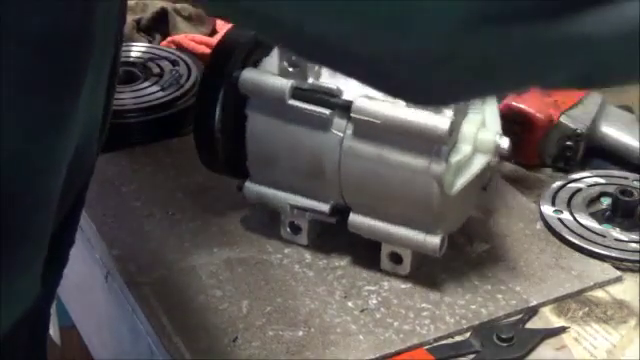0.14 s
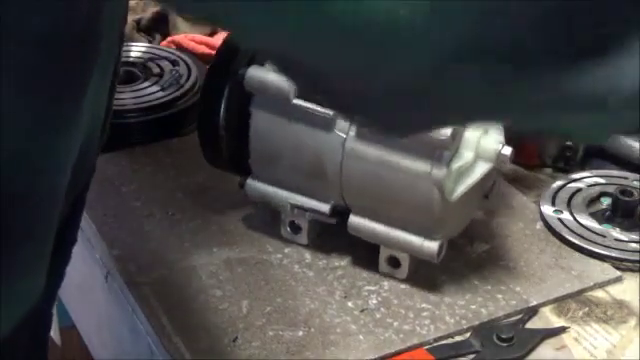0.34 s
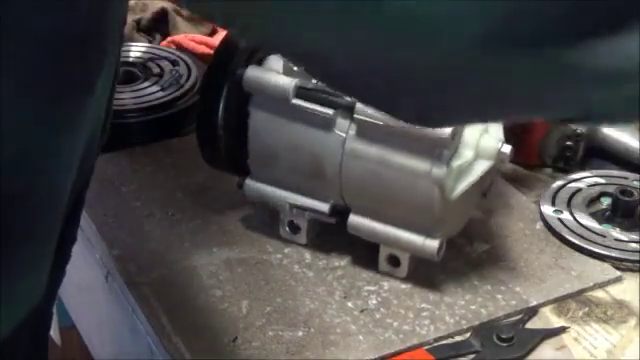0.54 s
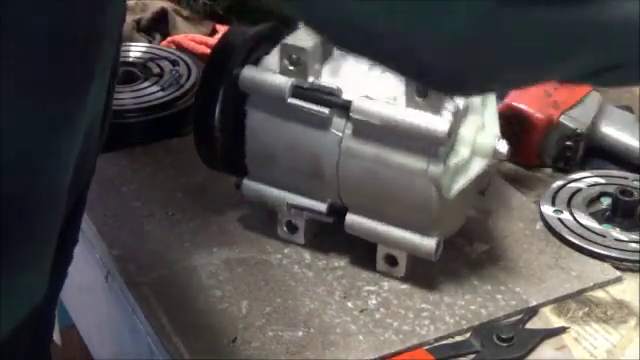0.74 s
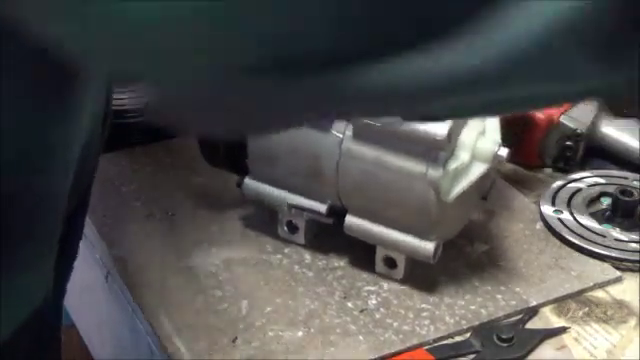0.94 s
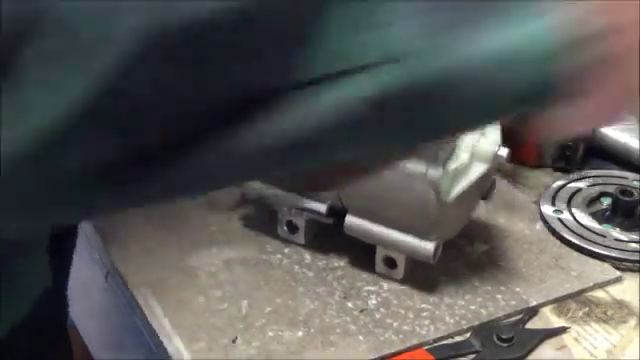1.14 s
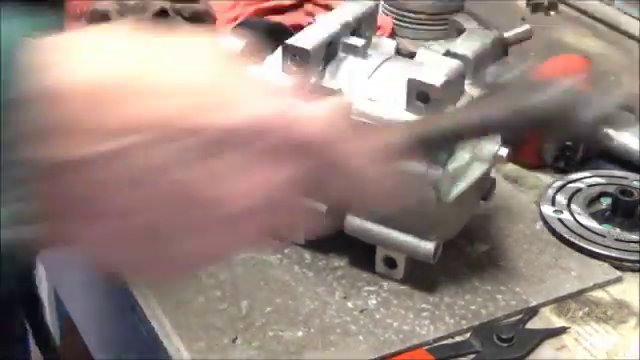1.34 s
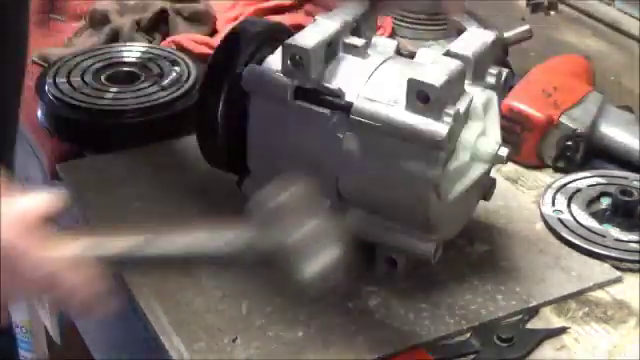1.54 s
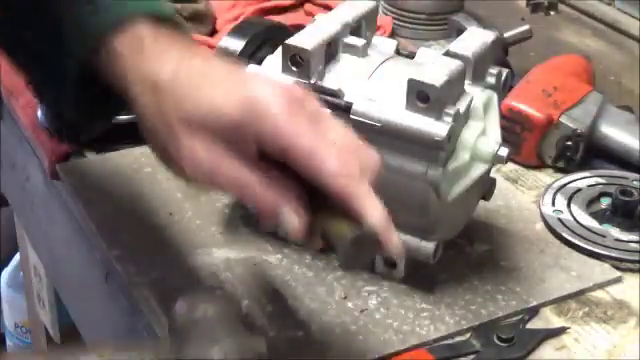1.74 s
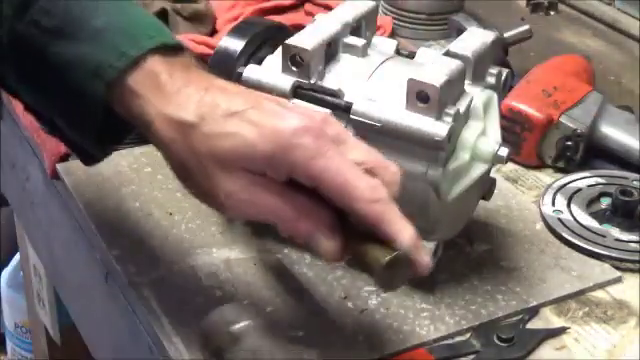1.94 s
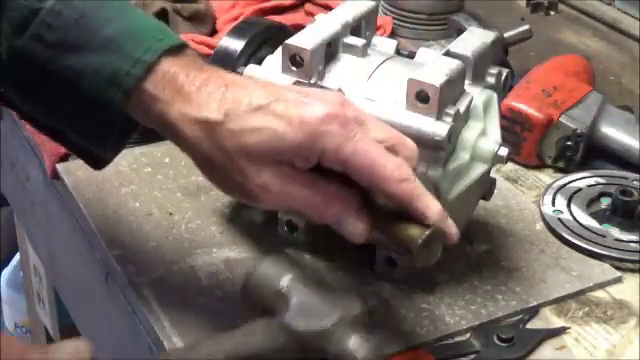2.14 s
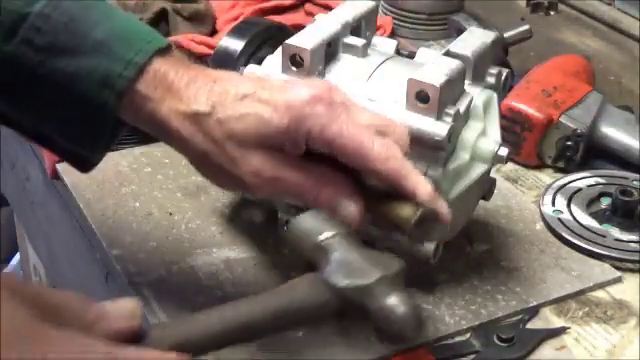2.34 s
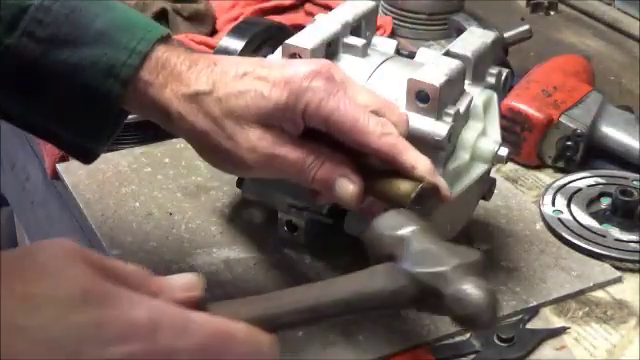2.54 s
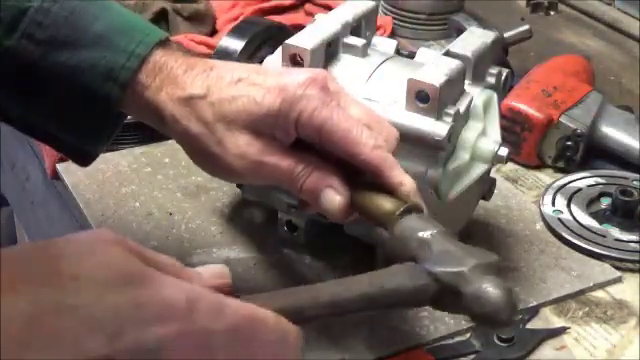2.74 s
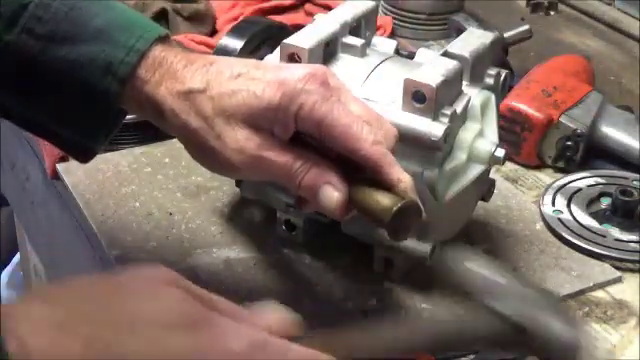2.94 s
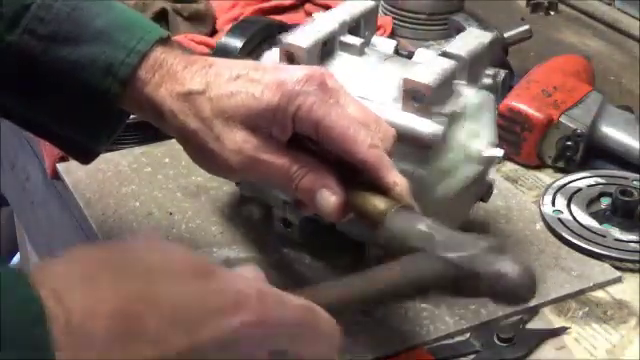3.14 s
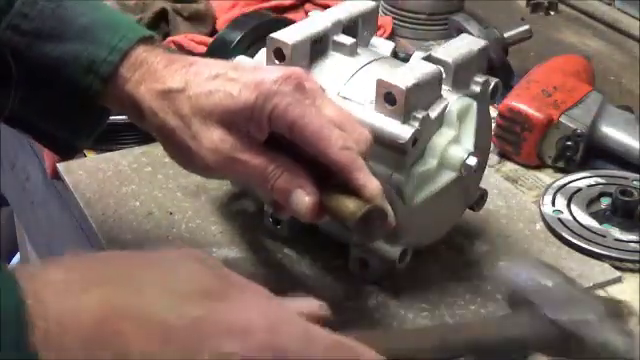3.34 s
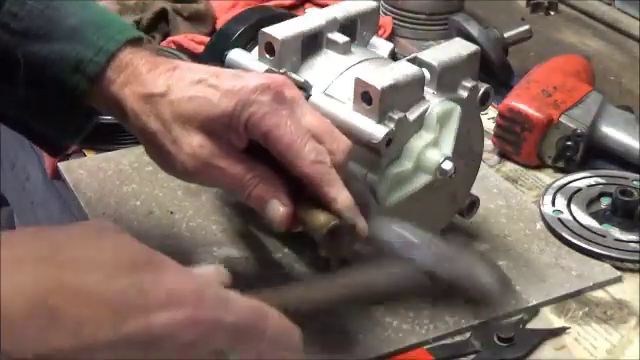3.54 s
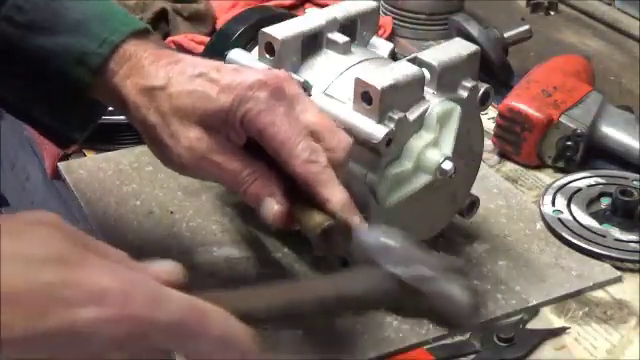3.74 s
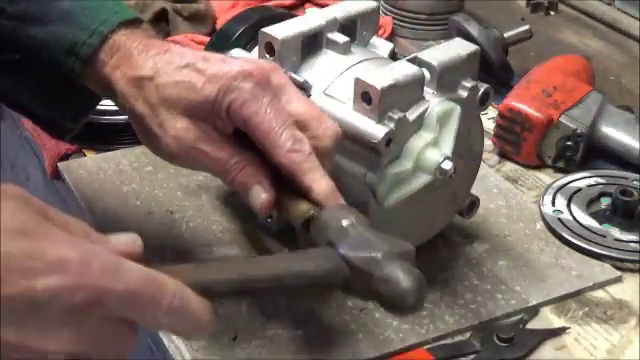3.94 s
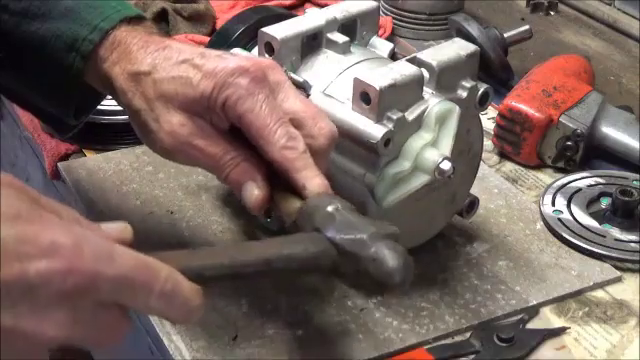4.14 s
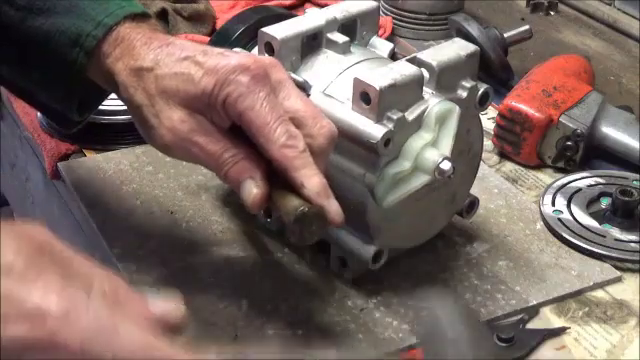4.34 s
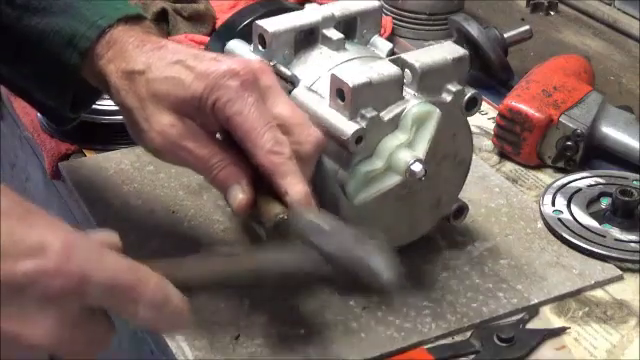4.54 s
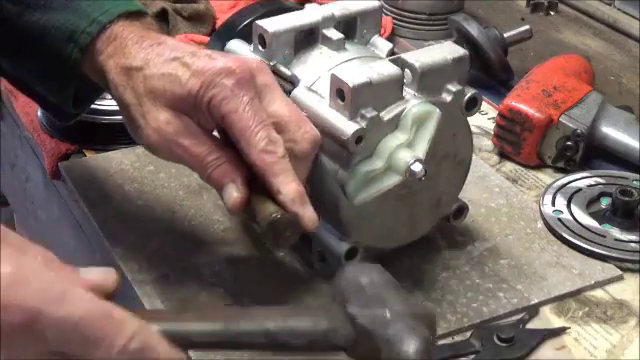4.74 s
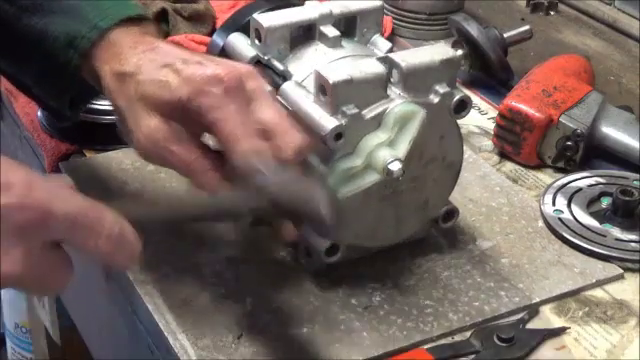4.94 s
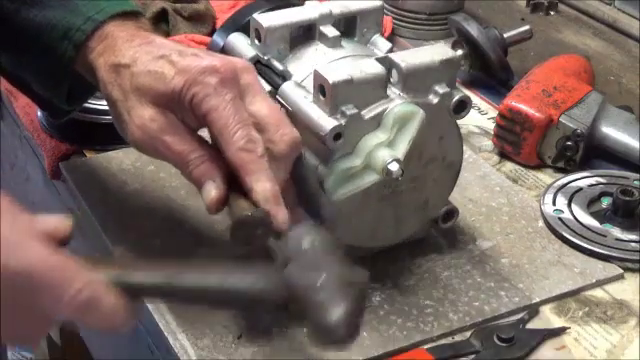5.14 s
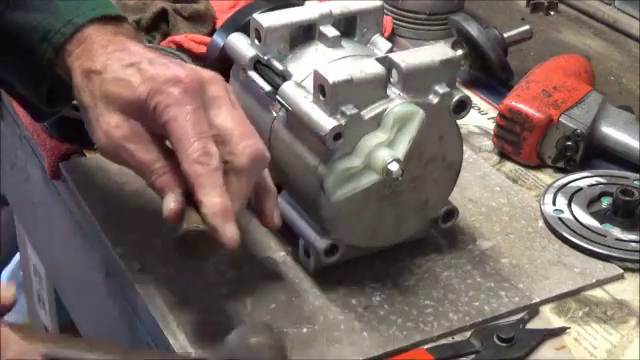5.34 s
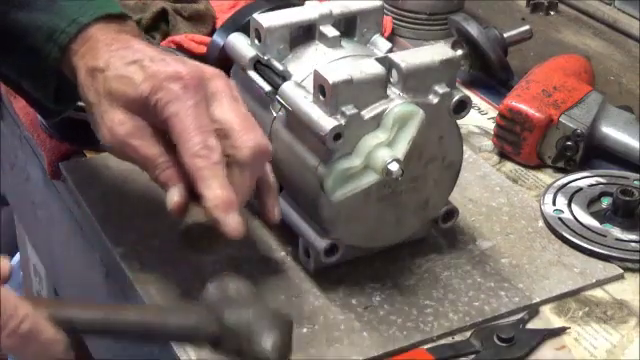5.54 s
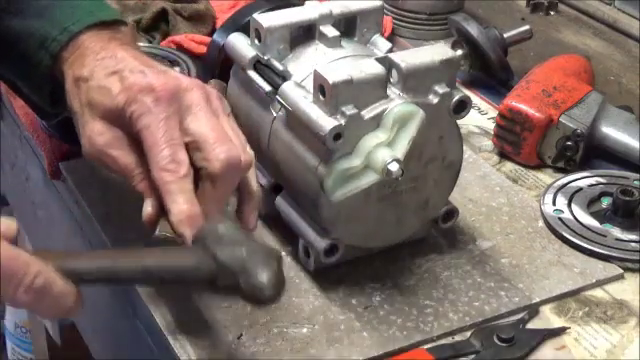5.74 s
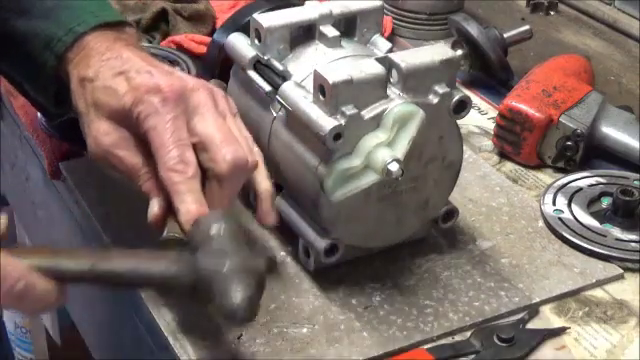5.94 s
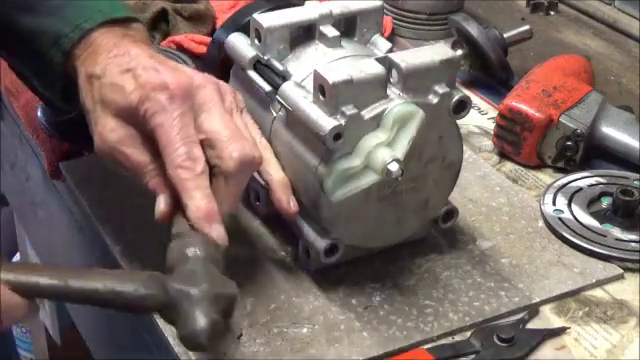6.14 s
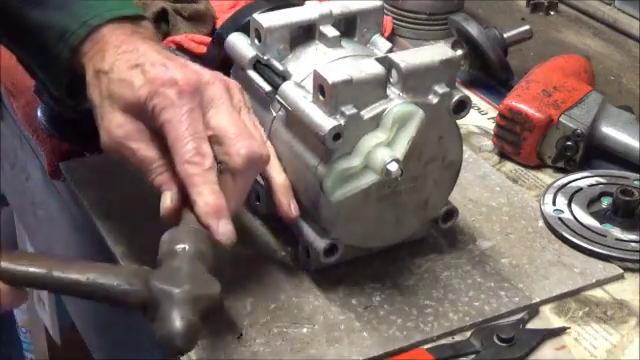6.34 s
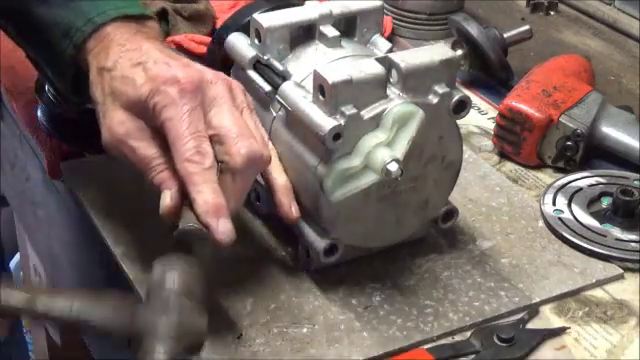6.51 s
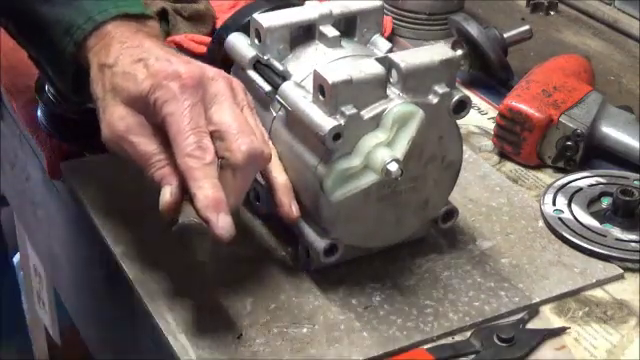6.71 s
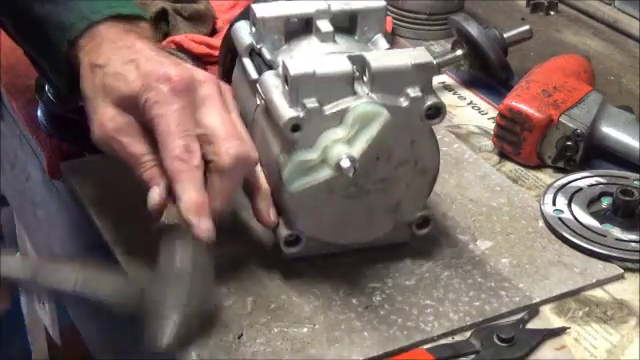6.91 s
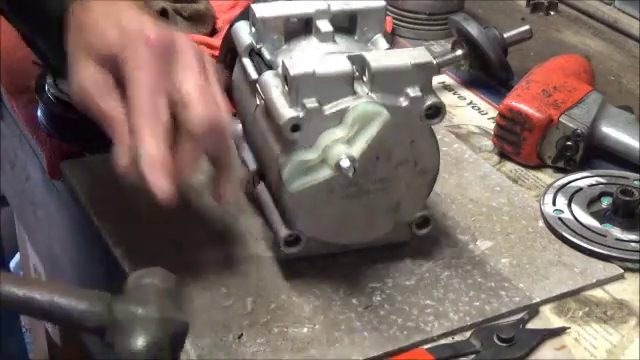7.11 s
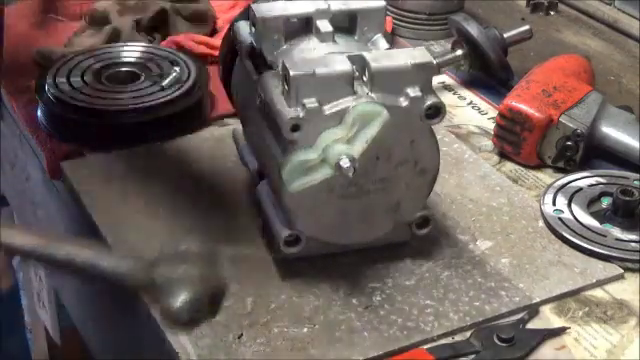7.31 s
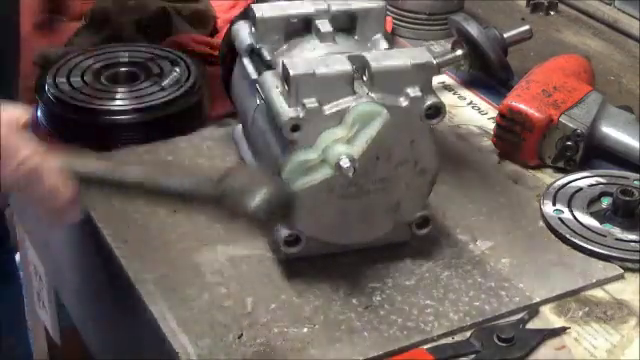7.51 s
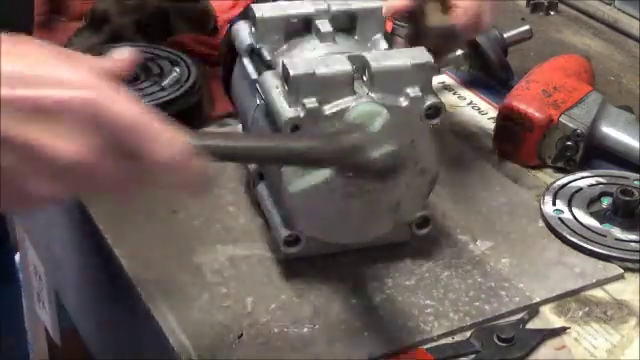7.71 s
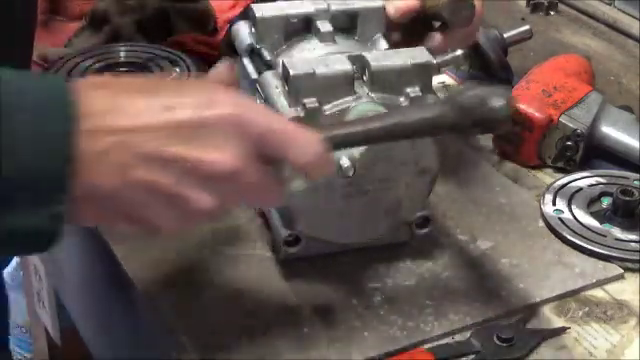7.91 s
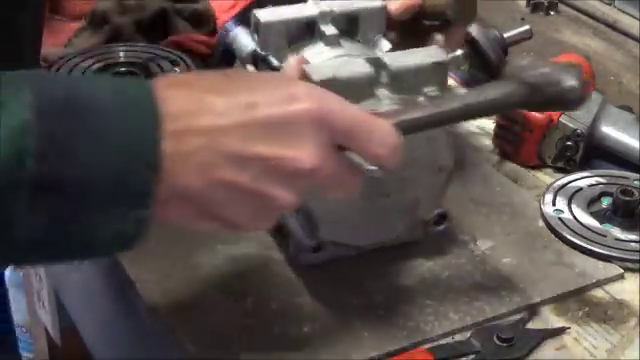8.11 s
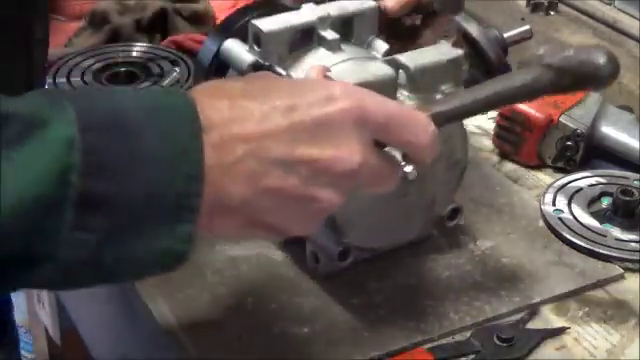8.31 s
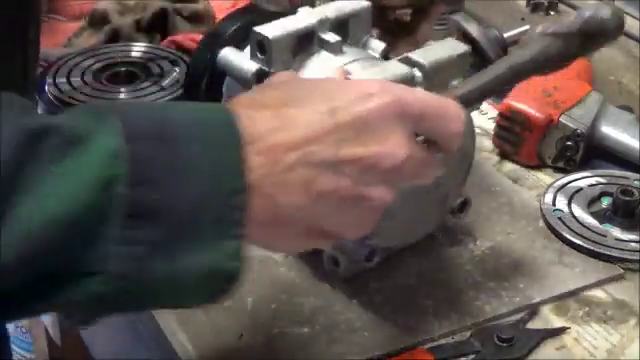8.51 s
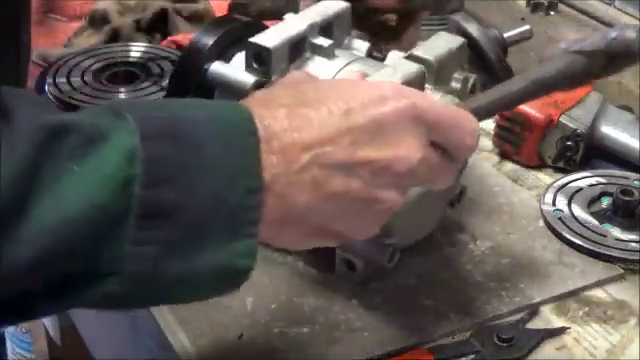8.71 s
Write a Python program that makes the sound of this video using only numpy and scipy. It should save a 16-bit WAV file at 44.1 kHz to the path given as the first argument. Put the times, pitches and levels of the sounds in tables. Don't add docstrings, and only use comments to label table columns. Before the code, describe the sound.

A steel hammer strikes a brass punch in spaced, hard ringing clanks while a heavy metal housing knocks and scrapes on a workbench.

```python
import sys
import numpy as np
from scipy import signal
from scipy.fft import rfft, irfft, next_fast_len
from scipy.io import wavfile
from scipy.ndimage import uniform_filter1d

SR = 44100
rng = np.random.default_rng(int(sys.argv[2]) if len(sys.argv) > 2 else 0)


def generate_wav(signal):
    frames = np.transpose(np.atleast_2d(signal))
    scaled = np.clip(frames, -1, 1) * 32767
    pcm = np.round(scaled).astype(np.int16)
    wavfile.write(sys.argv[1], SR, pcm)


def convert_level_to_amplitude(level_db):
    exponent = np.asarray(level_db, float) / 20
    return 10 ** exponent


N = 386757
LEAD = SR // 4


def at_hz(points, hz):
    points_hz, values = np.transpose(points)
    return np.interp(np.log(np.maximum(hz, 1)), np.log(points_hz), values)


def drift(rate_hz, size=N):
    knots = rng.standard_normal(3000)
    return np.interp(np.arange(size) / SR * rate_hz, np.arange(len(knots)), knots)


def dying(t, t60):
    return convert_level_to_amplitude(-60 * t / np.maximum(t60, 1e-3))


def add(track, start_s, sound):
    i = round(start_s * SR) + LEAD
    track[i:i + len(sound)] += sound[:len(track) - i]


# frequency_hz, likeness [0-1]
LEFT_RIGHT_LIKENESS = [(100, 1), (300, .98), (700, .93), (2000, .69), (8000, .68), (15000, .45)]


def stereo_noise(spectrum, size):
    padded = next_fast_len(size, True)
    hz = np.fft.rfftfreq(padded, 1 / SR)
    mid, side = rfft(rng.standard_normal((2, padded))) * convert_level_to_amplitude(at_hz(spectrum, hz))
    alike = np.clip(at_hz(LEFT_RIGHT_LIKENESS, hz), 0, 1)
    difference = np.sqrt(1 - alike) * side * [[1], [-1]]
    pair = irfft(np.sqrt(1 + alike) * mid + difference, padded)[:, :size]
    return pair / np.sqrt(np.mean(pair ** 2))


# frequency_hz, level_db [per Hz]
BENCH_THUD = [(40, -38), (70, -14.5), (135, 3.5), (200, -10.5), (300, -3.5), (500, -1.5), (900, -42.5)]


def bench_thud(t, level_db, t60):
    return convert_level_to_amplitude(level_db) * stereo_noise(BENCH_THUD, len(t))[0] * dying(t, t60)


# frequency_hz, level_db [per Hz]
CRACK_COLOUR = [(1200, -37), (2200, 1), (3800, 3.5), (6000, -8.5), (8500, -6.5), (11000, -38)]
# frequency_hz, level_db [per Hz]
EDGE_COLOUR = [(5000, -33), (8000, 2.5), (10000, 6), (12500, -6), (13500, -27.5), (16000, -30.5)]
# frequency_hz, level_db [per Hz]
BODY_COLOUR = [(250, -39), (500, -1), (1000, 2.5), (2000, 6.5), (3500, -43.5)]
BLOW_FOLLOWS = {"edge": (-4, 1.41, 0.12, 0.35, 0.48), "body": (-20.5, 0.664, 0.26, -0.2451, .01),
                "thud": (-52.5, 0.5, -0.4, 0.1, -0.3)}


def impact_noise(t, force_db, free, ring_db):
    causes = [force_db, *ring_db[:3]]
    level_db = {}
    for name, (offset_db, *slopes) in BLOW_FOLLOWS.items():
        level_db[name] = offset_db + np.dot(slopes, causes)
    clatter = convert_level_to_amplitude(-19.5) * dying(t, .22 * free)
    crack = convert_level_to_amplitude(force_db - 7.5) * stereo_noise(CRACK_COLOUR, len(t))[0]
    crack += convert_level_to_amplitude(level_db["edge"] + 9.5) * stereo_noise(EDGE_COLOUR, len(t))[0]
    sound = crack * (0.74 * dying(t, 0.02) + clatter)
    body = convert_level_to_amplitude(level_db["body"] + 3.5) * stereo_noise(BODY_COLOUR, len(t))[0]
    sound += body * (0.81 * dying(t, 0.033) + .9 * dying(t, 0.012) + 1.6 * clatter)
    return sound + bench_thud(t, level_db["thud"] - 3.0, 0.055 * free)


HEAD_HZ = [
    2790,
    5322,
    6372,
    8520,
    12705,
    1033,
]
# split_hz, t60_s
HEAD_PAIRS = [(35.3, 0.18), (8.7, 0.16), (7, 0.14), (45, 0.081), (25, 0.13), (4, 0.31)]


def head_ring(t, mode_db, free):
    sound = np.zeros(len(t))
    for hz, (split_hz, t60), db in zip(HEAD_HZ, HEAD_PAIRS, mode_db):
        grip, side, phase = rng.standard_normal(3)
        split = split_hz * np.sign(side)
        lower = 2 * np.pi * (hz + 0.076 * grip * split_hz - split / 2) * t
        pair = np.sin(lower) + 0.76 * np.sin(lower + 2 * np.pi * split * t + 3 * phase)
        pair *= convert_level_to_amplitude(4 * np.interp(t * 110, np.arange(40), rng.standard_normal(40)))
        sound += convert_level_to_amplitude(db + 6.5) * pair * dying(t, t60 * free)
    return sound


WEAK_HZ = [2976, 3860, 4194, 5082, 7590, 8302, 8968, 9620, 11720, 12270]
# level_db [re crack], t60_s
WEAK_DECAY = [(-31, .1), (-33.5, 0.13), (-59.5, 0.033), (-41, 0.25), (-22.5, 0.049), (-38.5, .1),
              (-37, 0.12), (-33, 0.17), (-35.5, 0.12), (-48.5, 0.11)]


def weak_ring(t, force_db, free):
    sound = np.zeros(len(t))
    for hz, (db, t60) in zip(WEAK_HZ, WEAK_DECAY):
        chance, shift = rng.standard_normal(2)
        tone = np.sin(2 * np.pi * (hz + 15 * shift) * t)
        sound += convert_level_to_amplitude(force_db + db + 3 * chance) * tone * dying(t, t60 * free)
    return sound


# start_s, force_db, freedom from the damping grip [0-1]
BLOWS = [(-.0646, -2.5, 0.43), (0.1414, 9.5, 0.57), (.41, 12, 0.7), (0.6756, 8, 1), (1.9653, -34.5, 0.43),
         (2.0953, -45, 0.65), (2.1943, -26, 0.14), (2.7955, -3, 0.39), (3.1717, 14.5, 0.93),
         (3.46, 12.5, 1), (3.9582, -19, 0.3), (4.0543, -8, 0.67), (4.4972, 17, 0.83), (4.9394, 13.5, 0.82),
         (5.5511, -29.5, 0.78), (6.2183, -14.5, 0.22), (6.8136, 19.5, 0.6)]
# bending_db, lengthwise_db, twisting_db, high_db, top_db [re force]
LANDING = [(-24.5, -23.5, -26, -17.5, -28), (-32, -21, -21, -11.5, -28), (-24, -17, -32, -12, -40.5),
           (-26, -20, -30.5, -9, -38), (-11, -4, -27, -16, -29), (-10, -9.5, -31, -35, -33),
           (-14, -29, -39, -39, -46), (-10, -16.5, -50, -19.5, -28), (-37, -22, -35, -12, -42.5),
           (-29, -13.5, -31.5, -14.5, -35.5), (-23, -43, -73, -45, -45), (-23, -30, -35, -22, -36),
           (-32, -23, -19.5, -16, -33.5), (-23, -16, -34.5, -13.5, -40), (-24, -43, -52, -28, -50),
           (-7, -25, -45, -20, -39), (-28.5, -21.5, -29, -20.5, -31)]
# start_s, level_db
FLANGE_BLOWS = [
    (-.06, -48.5),
    (.14, -46),
    (.41, -29.5),
    (.68, -38),
    (1.96, -54),
]


def hammer():
    out, t = np.zeros(N + LEAD), np.arange(SR // 3) / SR
    for (start_s, force_db, free), ring_db in zip(BLOWS, LANDING):
        housing_db = max([db for at_s, db in FLANGE_BLOWS if abs(at_s - start_s) < .05], default=-70)
        mode_db = [*(force_db + np.array(ring_db)), housing_db]
        sound = impact_noise(t, force_db, free, ring_db)
        sound += head_ring(t, mode_db, free)
        sound += weak_ring(t, force_db, free)
        add(out, start_s, sound * np.minimum(t / 0.0012, 1))
    return out


# frequency_hz, t60_s
ROOM_T60 = [(100, .5), (500, 0.38), (2000, 0.3), (6000, 0.28), (14000, 0.23)]


def room(x):
    t = np.arange(SR * 3 // 4) / SR
    edges_hz = 60 * 2 ** np.arange(0, 8.6, .5)
    noise = stereo_noise([(20, 0.011), (20000, 0.0044)], len(t))
    tail = np.zeros((2, len(t)))
    for low, high in zip(edges_hz, edges_hz[1:]):
        half_octave = signal.butter(2, [low, min(high, .45 * SR)], "band", fs=SR, output="sos")
        tail += signal.sosfilt(half_octave, noise) * dying(t, at_hz(ROOM_T60, low))
    tail *= np.minimum(t / 0.0019, 1)
    tail *= convert_level_to_amplitude(-5.5) / np.sqrt(np.sum(tail ** 2) / 2)
    tail[:, 0] = 1
    return signal.fftconvolve(x[None], tail)[:, LEAD:LEAD + N]


# start_s, level_db
AIR_LEVEL = [(0.0, -44), (.14, -46.5), (.68, -50), (1.05, -51.5), (1.9, -51), (2.6, -47.5), (3.55, -51),
             (3.71, -52), (5.01, -48), (5.18, -52.5), (6.18, -50), (6.6, -46), (6.91, -45.5), (7.15, -46.5),
             (7.72, -44), (8.04, -44.5), (8.18, -40), (8.5, -42.5)]
# frequency_hz, level_db [per Hz]
AIR_COLOUR = [(260, -41.5), (450, -13), (563, -6.5), (950, 1.5), (1650, -0.5), (2510, -8.5), (2700, -11),
              (4770, -22.5), (7030, -26.5), (9920, -25), (14600, -38.5), (16000, -47)]
# frequency_hz, level_db [per Hz]
RUMBLE_COLOUR = [(25, -18), (50, -16), (62, -9), (95, -16.5), (125, 3.5), (160, -10), (210, -5), (310, -6),
                 (450, -1.5), (600, -35)]


def shop_air():
    times_s, levels_db = np.transpose(AIR_LEVEL)
    air_db = np.interp(np.arange(N) / SR, times_s, levels_db)
    air = convert_level_to_amplitude(air_db + 0.66 + 2.1 * drift(25)) * stereo_noise(AIR_COLOUR, N)
    rumble_db = -64 + 1.2 * (air_db - air_db.mean())
    return air + convert_level_to_amplitude(rumble_db) * stereo_noise(RUMBLE_COLOUR, N)


def contact(t, peak_db, centre_hz, spread, t60):
    burst = rng.standard_normal(len(t)) * (dying(t, 0.5 * t60) + 0.12 * dying(t, 0.56 * t60))
    edges_hz = [centre_hz / spread, min(centre_hz * spread, .45 * SR)]
    burst = signal.sosfilt(signal.butter(2, edges_hz, "band", fs=SR, output="sos"), burst)
    return convert_level_to_amplitude(peak_db - 10.5) * burst / np.abs(burst).max()


# start_s,
# peak_db, centre_hz, thud_db
KNOCKS = [(.021, -11, 1700, -40), (.227, 0, 1810, -44), (.267, -6, 1810, -38.5), (.495, -11, 1010, -43),
          (.533, -14, 1040, -43), (.759, -9, 1820, -38), (.794, -1, 2310, -41), (1.59, -24, 1410, -72),
          (1.708, -26, 1720, -73), (2.196, -20, 480, -53), (2.828, -6, 2020, -62),
          (3.247, -22, 2520, -47.5), (4.086, -5, 2300, -60), (4.575, -36, 2530, -52),
          (5.019, -2.5, 2540, -54), (5.708, -24.5, 2040, -56), (5.955, -27.5, 1710, -58),
          (6.219, -16.5, 430, -54.5), (6.865, 4.5, 1045, -34), (7.536, -18, 1080, -50),
          (7.777, -32, 1620, -46.5), (7.86, -14, 1200, -41.5), (7.901, 0, 910, -42),
          (8.119, -13.5, 1040, -38.5), (8.177, -11.5, 1150, -62), (8.549, -20.5, 1270, -44.5),
          (8.675, -34, 1240, -57)]


def housing_knocks():
    out, t = np.zeros(N + LEAD), np.arange(SR // 8) / SR
    for start_s, peak_db, centre_hz, thud_db in KNOCKS:
        add(out, start_s, contact(t, peak_db, centre_hz, spread=1.93, t60=.034))
        add(out, start_s, bench_thud(t, thud_db - 0.5, 0.18))
    return out


# start_s, peak_db, centre_hz
FINGER_TICKS = [(1.043, -42, 11760), (1.8403, -32, 10200), (1.921, -33, 9600), (2.0164, -30, 9700),
                (2.0443, -37, 8500), (2.1094, -38, 10800), (2.1644, -47, 8540), (2.241, -26, 8850),
                (2.2917, -30, 9560), (2.322, -26.5, 9800), (2.4039, -34, 10200), (2.6403, -11, 9140),
                (3.0572, -36.5, 8730), (3.0924, -36, 6400)]
# start_s, peak_db, centre_hz
GRIT_TICKS = [(4.1599, -33, 9260), (4.1812, -29, 9610), (4.1985, -34.5, 9850), (4.2239, -24, 7510),
              (4.2617, -29, 7960), (4.3061, -23.5, 8850), (4.362, -32, 9080), (4.7894, -36, 8540),
              (6.014, -33, 9990), (6.1114, -40, 10100), (6.2682, -26.5, 8400), (6.5979, -39, 10100),
              (6.6493, -43.5, 8500), (6.6742, -33, 9280), (6.7037, -18.5, 7530), (6.7114, -50.5, 8830),
              (7.3614, -34, 9150), (8.3708, -31, 6510)]


def ticks():
    out, t = np.zeros(N + LEAD), np.arange(SR // 8) / SR
    for start_s, peak_db, centre_hz in [*FINGER_TICKS, *GRIT_TICKS]:
        add(out, start_s, contact(t, peak_db, centre_hz, spread=1.3, t60=0.0074))
    return out


# peak_s, swell_s, fade_s, hiss_db [sleeve], slide_db [housing]
MOVES = [(1.044, .012, 0.088, -68.5, -60), (1.56, .11, 0.13, -48.5, -53), (1.714, 0.015, 0.095, -37, -42),
         (1.97, 0.25, 1, -63, -67), (2.66, 1, 1, -66, -54.5), (3.95, 0.25, .11, -69, -67),
         (4.2, 0.079, 0.42, -52.5, -58), (4.49, .3, .11, -66, -66.5), (5.6, 0.99, 0.64, -65, -59.5),
         (6.26, 0.27, 0.43, -56.5, -58), (6.724, 0.21, 0.03, -58.5, -53), (7.12, .21, .3, -71, -62),
         (7.588, .21, 0.064, -41.5, -50.5), (7.79, 0.023, 0.24, -41, -40.5), (7.91, 0.2, 0.22, -45, -36.5),
         (8.0, 0.13, 0.15, -51, -44), (8.125, 0.028, 0.24, -48, -36), (8.314, .06, 0.1, -56, -52),
         (8.46, 0.08, 0.35, -61, -47), (8.552, 0.085, .15, -51.5, -37.5), (8.68, 0.37, 0.17, -51, -41.5)]
# frequency_hz, level_db [per Hz]
HISS_COLOUR = [(2650, -33), (4500, -5.5), (6630, -4.5), (9720, 3), (11300, -3), (14700, -13.5),
               (16000, -24)]
# frequency_hz, level_db [per Hz]
SLIDE_COLOUR = [(1180, -19.5), (2000, 1.5), (2350, -7), (2930, 0.5), (3450, -3.5), (4190, -6.5),
                (7000, -15.5), (9100, -47), (15400, -120)]


def handling():
    t = np.arange(0, N + 64, 64) / SR
    gains = np.zeros((2, len(t)))
    for peak_s, swell_s, fade_s, hiss_db, slide_db in MOVES:
        span_s = np.maximum(np.where(t < peak_s, swell_s, fade_s), 1e-3)
        loss_db = 24.5 * (np.abs(t - peak_s) / span_s) ** 1.36
        gains = np.maximum(gains, convert_level_to_amplitude(np.c_[[hiss_db, slide_db]] - loss_db))
    hiss_gain, slide_gain = [np.interp(np.arange(N) / SR, t, g) for g in gains]
    slide = convert_level_to_amplitude(4.6 * drift(250)) * stereo_noise(SLIDE_COLOUR, N)
    hiss = convert_level_to_amplitude(4.2 * drift(300)) * stereo_noise(HISS_COLOUR, N)
    return convert_level_to_amplitude(-.5) * hiss_gain * hiss + convert_level_to_amplitude(-1.5) * slide_gain * slide


# start_s, end_s, pitch_hz, width_hz, level_db
RUBS = [(3.87, 3.96, 2790, 40, -52), (3.8, 3.92, 5322, 32, -66), (7.82, 8.06, 4050, 250, -46),
        (7.84, 7.96, 3400, 300, -43), (6.72, 6.83, 490, 220, -43), (7.82, 7.9, 2500, 200, -50),
        (8.1, 8.25, 3280, 35, -49), (8.44, 8.77, 3280, 35, -49.5), (8.5, 8.77, 1100, 120, -41),
        (8.11, 8.26, 4250, 70, -53), (8.5, 8.75, 2800, 200, -46), (2.3, 2.79, 3080, 110, -60),
        (2.35, 2.79, 4350, 110, -66)]


def rubs():
    out = np.zeros(N + LEAD)
    for start_s, end_s, hz, width_hz, db in RUBS:
        size = round((end_s - start_s) * SR)
        slips = rng.standard_normal(size) * convert_level_to_amplitude(7.8 * drift(41, size))
        ring = signal.lfilter(*signal.iirpeak(hz, hz / width_hz, SR), slips)
        add(out, start_s, convert_level_to_amplitude(db) * ring / ring.std() * np.hanning(size) ** 0.39)
    return out


def scene():
    small = ticks()
    struck = room(hammer() + housing_knocks() + rubs() + 0.59 * small)
    return struck + 0.95 * small[LEAD:] + handling() + shop_air()


def roll_off(x):
    return signal.sosfilt(signal.butter(12, 16810, fs=SR, output="sos"), x)


def record(dry):
    ceiling_db, release_db_per_s = -16, 380
    dry = signal.sosfilt(signal.butter(2, 75, "high", fs=SR, output="sos"), dry)
    power = signal.lfilter([.02], [1, -.98], np.mean(dry ** 2, axis=0))
    over_db = np.maximum(10 * np.log10(power + 1e-12) - ceiling_db, 0)
    release_db = release_db_per_s * np.arange(N) / SR
    held_db = np.maximum.accumulate(over_db + release_db) - release_db
    held_db = np.roll(uniform_filter1d(held_db, size=61), -55)
    limited = 1.04 * np.tanh(dry * convert_level_to_amplitude(-.78 * held_db) / 0.92)
    top_cut = signal.cheby1(8, 1, 15800, fs=SR, output="sos")
    return roll_off(signal.sosfilt(top_cut, limited))


dry = scene()
out = record(dry)
generate_wav(out)
```